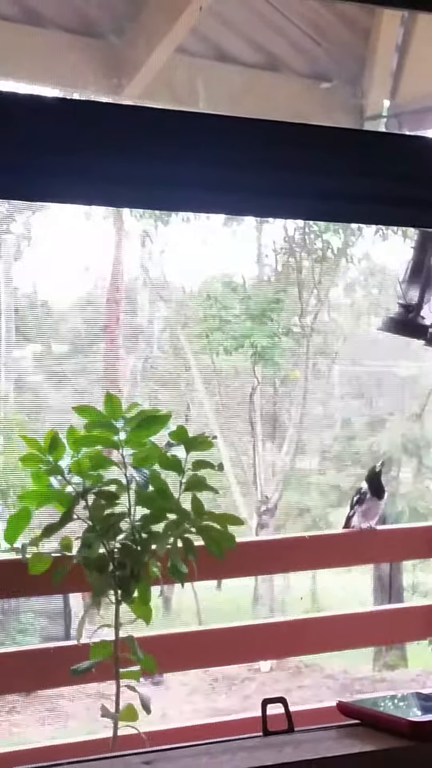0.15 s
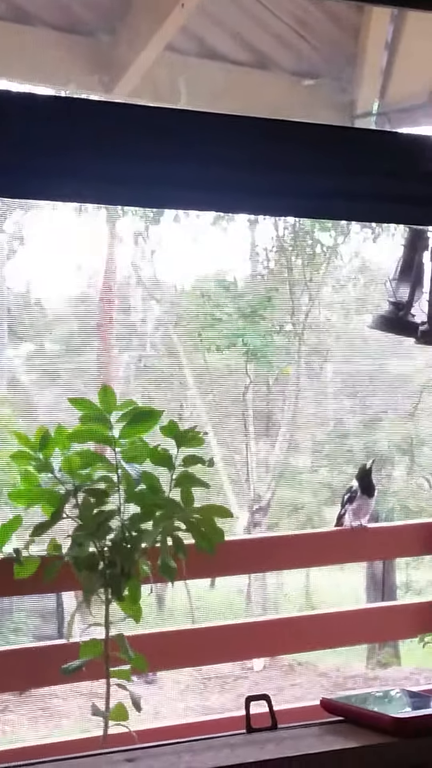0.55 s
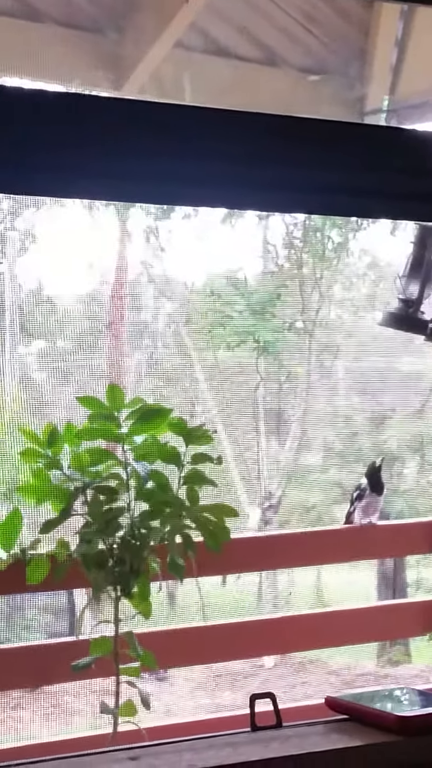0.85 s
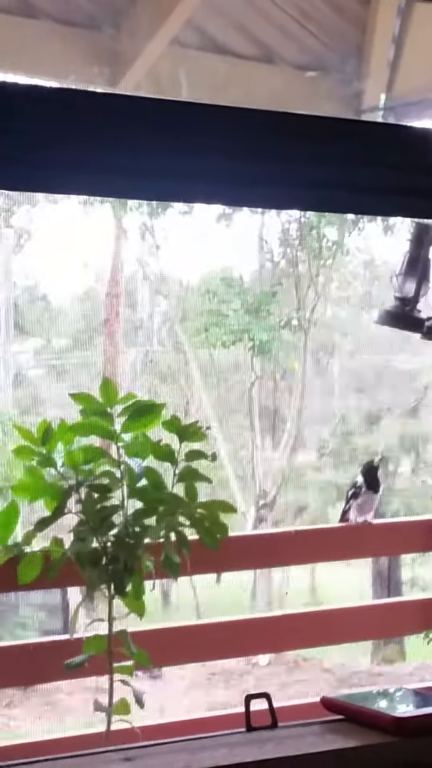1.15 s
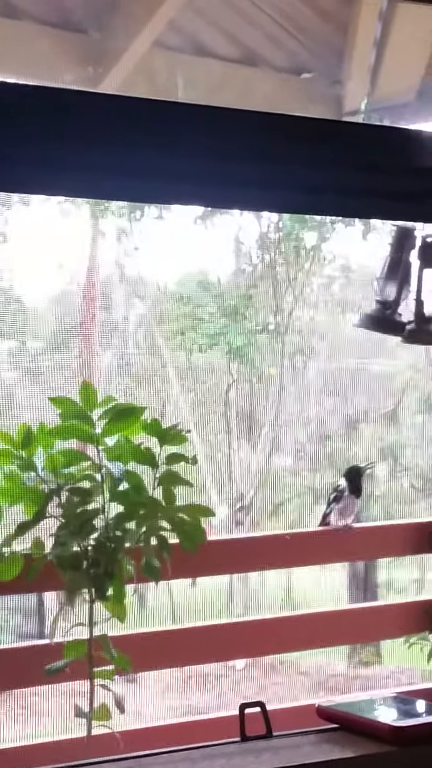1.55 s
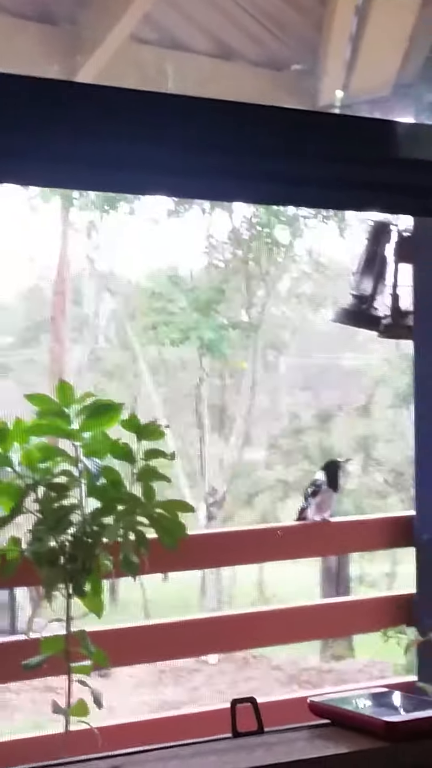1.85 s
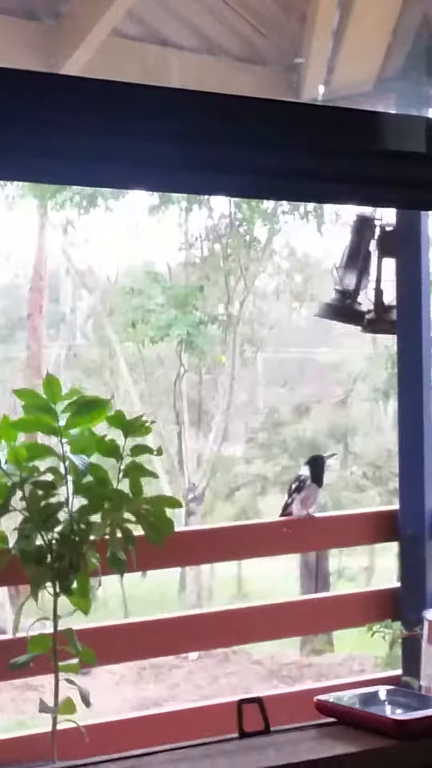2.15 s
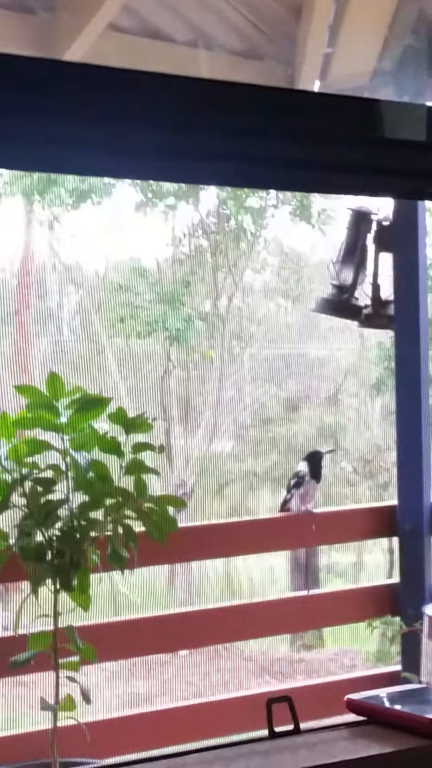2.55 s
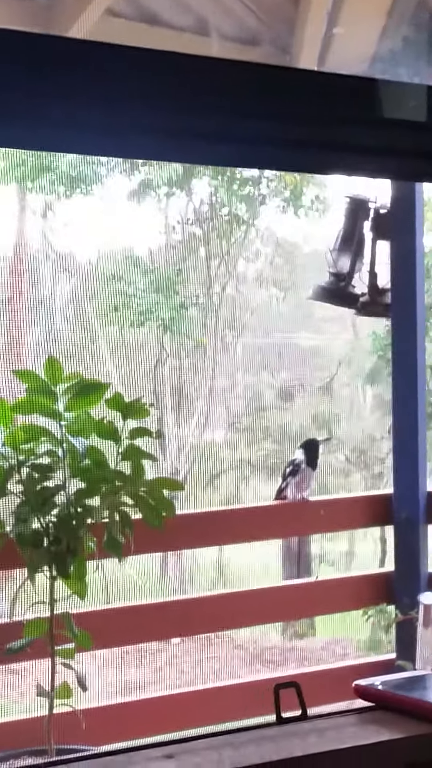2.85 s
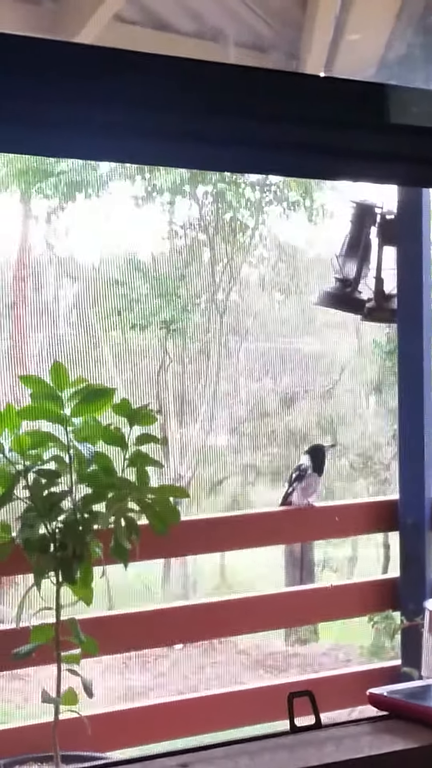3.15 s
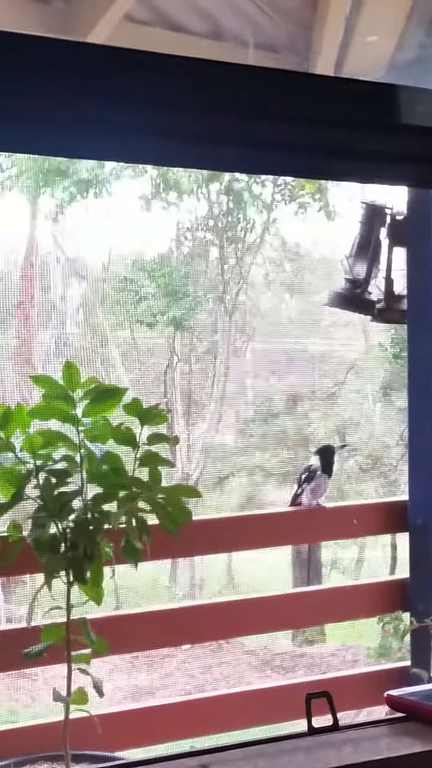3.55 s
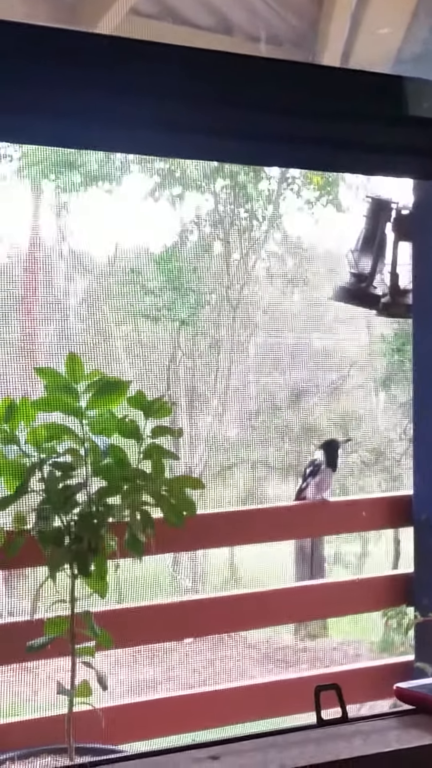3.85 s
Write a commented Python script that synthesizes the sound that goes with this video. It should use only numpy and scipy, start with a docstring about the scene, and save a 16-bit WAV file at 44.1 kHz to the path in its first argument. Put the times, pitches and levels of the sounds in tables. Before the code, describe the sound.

A butcherbird gives a strong, nearly steady high whistle from 0 to 0.4 s, then after a gap a tiny reedy catch and three quick whistles at 1.0-1.85 s, the later ones gliding down. Soft, low, flutelike hoots follow around 2.2-2.6 and 2.9-3.4 s. Short diffuse echoes trail the song. Fine rain hisses throughout; low wind thumps buffet the phone microphones until about 1.8 s.

```python
"""On a veranda, a butcherbird on the rail whistles four high fluted notes, then soft low ones, as gliding sines.
The microphones of a phone are a few metres off; roof and trees echo the song as dense, dying noise tails.
Fine rain hisses all round, shaped from noise, and eddies of wind thump on each port in about one cycle."""
import sys
import numpy as np
from scipy import signal
from scipy.fft import rfft, irfft
from scipy.io import wavfile
from scipy.ndimage import uniform_filter1d

SR = 44100
rng = np.random.default_rng(int(sys.argv[2]) if len(sys.argv) > 2 else 0)


def pcm_store(signal):
    """Save signal as 16-bit PCM."""
    levels = np.round(np.clip(np.atleast_2d(signal), -1, 1) * 32767)
    wavfile.write(sys.argv[1], SR, levels.astype(np.int16).T)


def volts_from_db(level):
    """Convert decibel levels to linear amplitude ratios."""
    exponent = np.asarray(level, float) / 20
    return 10 ** exponent


N = 176400
TIME = np.arange(N) / SR
FREQ = np.maximum(np.fft.rfftfreq(N, 1 / SR), 1)


def across(table):
    """Reads a table of (frequency [Hz], value) at every frequency, straight in log frequency."""
    hz, value = np.array(table, float).T
    return np.interp(np.log(FREQ), np.log(hz), value)


def walk(rate):
    """Random levels held for 1 / rate seconds and smoothed twice; spread near 1."""
    hold = int(SR / rate)
    steps = np.repeat(rng.standard_normal(N // hold + 1), hold)
    smooth = uniform_filter1d(uniform_filter1d(steps, hold), hold)
    return 1.67 * smooth[:N]


def swell(start, length, attack, release):
    """Rises from start, holds, and falls from start + length; each edge is half a cosine."""
    rise = (TIME - start) / attack
    fall = (start + length + release - TIME) / release
    edge = np.clip(np.minimum(rise, fall), 0, 1)
    return np.sin(np.pi / 2 * edge) ** 2


def late(x, lag_s):
    """The sound reaches the right port a little after the left, as a phase slope."""
    right = irfft(rfft(x) * np.exp(-2j * np.pi * FREQ * lag_s), N)
    return np.array([x, right])


# high whistles at the beak, one list a note:
# (time [s], pitch [Hz], fundamental rms level [dB], base level of the overtones [dB])
WHISTLES = [
    [(0, 2613, -31.5, -56), (.065, 2501, -20.5, -56), (.12, 2509, -18.5, -52), (.2, 2504, -18, -49),
     (.238, 2502, -16.5, -50.5), (.255, 2505, -32.5, -50), (.29, 2510, -32, -58), (.34, 2565, -35.5, -68),
     (.39, 2575, -46, -78), (.48, 2562, -58, -99.5)],
    [(1.03, 2830, -54, -62), (1.042, 2854, -42, -49), (1.056, 2720, -36, -50), (1.07, 2506, -27.5, -50.5),
     (1.088, 2507, -23, -53), (1.1, 2510, -41.5, -54), (1.13, 2505, -41, -61), (1.165, 2553, -39.5, -62),
     (1.21, 2580, -44, -64), (1.235, 2600, -53, -80)],
    [(1.236, 3300, -59, -83), (1.246, 3230, -45, -78), (1.258, 3090, -53, -75), (1.264, 2768, -38.5, -70),
     (1.284, 2675, -24, -52), (1.305, 2612, -33, -46.5), (1.35, 2622, -33.5, -50.5), (1.38, 2620, -39, -66),
     (1.43, 2600, -45, -80)],
    [(1.388, 3420, -54, -78), (1.397, 3260, -42, -78), (1.408, 3070, -45, -76), (1.42, 2967, -39, -74),
     (1.445, 2796, -32.5, -68), (1.49, 2745, -28.5, -45.5), (1.55, 2686, -22.5, -53),
     (1.59, 2604, -33, -48), (1.66, 2561, -30.5, -41), (1.74, 2544, -32.5, -47.5), (1.81, 2554, -42.5, -58),
     (1.822, 2562, -50, -57), (1.88, 2573, -62, -68)],
]
# second, third and fourth partial over that base: (level [dB] of each)
OVERTONES_DB = (-2, 3.5, -12.5)
# extra fullness of the second partial, one value a note: (level [dB] of each)
SECOND_PARTIAL_DB = (3.5, 1.5, -2, -0.5)
WAVER_HZ, WAVER_DB = 4.5, -1  # spread of the random pitch and level waver


def whistles():
    """Near sines that glide, with weak overtones and a slight waver in pitch and level."""
    out = 0
    drift = WAVER_HZ * walk(61.15)
    shake = WAVER_DB * walk(40.7)
    for note, second_db in zip(WHISTLES, SECOND_PARTIAL_DB):
        s, hz, db, over_db = np.array(note, float).T
        phase = 2 * np.pi * np.cumsum(np.interp(TIME, s, hz) + drift) / SR
        tone = volts_from_db(np.interp(TIME, s, db)) * np.sin(phase)
        overtones = 0
        for partial, partial_db in enumerate(OVERTONES_DB, 2):
            extra_db = second_db if partial == 2 else 0
            overtones = overtones + volts_from_db(partial_db + extra_db) * np.sin(partial * phase)
        overtones = volts_from_db(np.interp(TIME, s, over_db)) * overtones
        gate = swell(s[0] - .004, s[-1] - s[0], .004, .004)
        out = out + gate * volts_from_db(shake) * (tone + overtones)
    return np.sqrt(2) * out  # peak from rms


# low notes at the beak: (start [s], time to the release [s], starting pitch [Hz], starting rms level [dB])
HOOTS = [(2.21, 0.012, 1110, -39.5), (2.275, 0.044, 1112, -51.5), (2.435, 0.023, 888, -48.5),
         (2.48, 0.052, 820, -52.5), (2.54, 0.072, 855, -45.5), (2.87, 0.012, 898, -44.5),
         (2.96, 0.05, 832, -47.5), (3.01, 0.046, 832, -42), (3.08, 0.34, 797, -51.5),
         (3.144, 0.16, 814, -35.5), (3.3, 0.072, 804, -43)]
HOOT_ATTACK_S, HOOT_RELEASE_S = .025, .025
HOOT_SAG_HZ_PER_S, HOOT_FADE_DB_PER_S = 40, 85
HOOT_THIRD_DB = -22  # third partial over the fundamental


def hoots():
    """Soft low flute notes whose pitch sags and level fades, with a weak third partial."""
    out = 0
    for start, length, hz, db in HOOTS:
        since = TIME - start
        phase = 2 * np.pi * (hz - HOOT_SAG_HZ_PER_S * since / 2) * since
        level = volts_from_db(db - HOOT_FADE_DB_PER_S * np.clip(since, 0, 1))
        tone = np.sin(phase) + volts_from_db(HOOT_THIRD_DB) * np.sin(3 * phase)
        out = out + level * swell(start, length, HOOT_ATTACK_S, HOOT_RELEASE_S) * tone
    return np.sqrt(2) * out  # peak from rms


CATCH_S, CATCH_LENGTH_S, CATCH_HZ = 1.007, .022, 1260
CATCH_DB = (-51, -55, -55)  # partials 3 to 5, before the roughness


def throat_catch():
    """A reedy catch in the throat before the second whistle: three steady partials, roughened in level."""
    tone = 0
    for partial, db in enumerate(CATCH_DB, 3):
        tone = tone + volts_from_db(db) * np.sin(2 * np.pi * partial * CATCH_HZ * TIME)
    rough = volts_from_db(5 * walk(400))
    return np.sqrt(2) * tone * rough * swell(CATCH_S, CATCH_LENGTH_S, .008, .006)


# colour of the reflections off roof and trees: (frequency [Hz], level [dB])
REFLECTION_COLOUR = [(1500, 0), (2500, -4.5), (2660, 2), (2950, 5), (3250, -3), (8000, -4)]
ECHO_T60_S, ECHO_BUILD_S = .42, .03  # time to die by 60 dB, time constant of the build-up
ECHO_DB, ECHO_ALIKE = -7, .5  # mean level, power share common to both ports
LEAF_FLUTTER_DB, LEAF_FLUTTER_PER_S = 2.5, 90


def echoes(song):
    """Dense, coloured, dying reflections, partly the same at both ports; moving leaves make them flutter."""
    t = TIME[:SR]
    coloured = irfft(rfft(song) * volts_from_db(across(REFLECTION_COLOUR)), N)
    raw = rng.standard_normal((3, SR))
    tail = np.sqrt(ECHO_ALIKE) * raw[0] + np.sqrt(1 - ECHO_ALIKE) * raw[1:]
    decay = np.exp(-np.log(1000) * t / ECHO_T60_S)
    build = 1 - np.exp(-t / ECHO_BUILD_S)
    tail = tail * decay * build
    tail = tail / np.sqrt((tail ** 2).sum(axis=1, keepdims=True))  # unit energy
    flutter_db = LEAF_FLUTTER_DB * walk(LEAF_FLUTTER_PER_S)
    reflected = signal.fftconvolve(coloured[None], tail, axes=1)[:, :N]
    return volts_from_db(ECHO_DB + flutter_db) * reflected


# wind eddies on the ports: (time [s], level of the thump's envelope [dB], pitch [Hz], port [0 left, 1 right])
WIND_EDDIES = [(0.15, -22.5, 92, 0), (0.229, -28, 67.6, 0), (0.319, -40.5, 74.6, 0), (0.721, -39, 174, 0),
               (0.888, -35.5, 59, 0), (0.969, -31, 72, 0), (1.116, -28.5, 79.5, 0), (1.157, -23.5, 73, 0),
               (1.196, -33.5, 81, 0), (1.236, -30, 63, 0), (1.304, -28, 67, 0), (1.778, -39, 83, 0),
               (0.001, -34.5, 99, 1), (0.056, -31, 67, 1), (0.105, -20, 125, 1), (0.129, -31, 69, 1),
               (0.287, -34, 64, 1), (0.351, -28.5, 75, 1), (0.427, -31.5, 66, 1), (0.474, -33.5, 116.3, 1),
               (0.566, -26.5, 61, 1), (0.609, -21.5, 60.7, 1), (0.645, -30, 70, 1), (0.692, -27, 67, 1),
               (0.723, -27, 118, 1), (0.759, -33, 79, 1), (0.786, -35.5, 70, 1), (0.812, -37.5, 78, 1),
               (1.248, -31, 64, 1), (1.322, -32, 72, 1), (1.408, -34, 73, 1), (1.433, -28.5, 81, 1),
               (1.46, -25.5, 84, 1), (1.529, -33.5, 52.6, 1), (1.579, -36.5, 69.6, 1)]
EDDY_TURNS, RUMBLE_S = 0.44, 0.032  # half-widths at 1/e: thump in cycles, rumble in seconds
EDDY_EDGE_DB, RUMBLE_DB = -37, -16  # rms over the thump's envelope


def noise_band(corner_hz, kind, db):
    """Filtered noise for both ports, set to an rms level."""
    sos = signal.butter(2, corner_hz, kind, fs=SR, output="sos")
    noise = signal.sosfilt(sos, rng.standard_normal((2, N)))
    return volts_from_db(db) * noise / noise.std()


def wind():
    """Each eddy is a thump of about one cycle on one port, with a rough edge, in a longer rumble."""
    out = np.zeros((2, N))
    turns = rng.random(len(WIND_EDDIES))  # random starting phase
    edge = noise_band(350, "low", EDDY_EDGE_DB)
    rumble = noise_band((30, 110), "band", RUMBLE_DB)
    for (start, db, hz, port), turn in zip(WIND_EDDIES, turns):
        since = TIME - start
        cycles = since * hz
        thump = np.cos(2 * np.pi * (cycles + turn)) + edge[port]
        out[port] += volts_from_db(db) * np.exp(-(cycles / EDDY_TURNS) ** 2) * thump
        out[port] += volts_from_db(db) * np.exp(-(since / RUMBLE_S) ** 2) * rumble[port]
    return out


# rain on leaves and roof over a low murmur, before it swells: (frequency [Hz], density [dB per Hz])
RAIN_SPECTRUM = [(20, -79.5), (60, -73.5), (130, -79.5), (260, -85.5), (500, -84.5), (800, -81.5),
                 (2000, -87.5), (16000, -96)]
# swelling and easing of the hiss: (time [s], level [dB])
RAIN_SWELL = [(0, 2.5), (.7, 2.5), (.9, 1.5), (1.7, 2), (1.9, 2), (2, -0.5), (2.9, -0.5), (3.1, 1),
              (3.4, 2), (4, -1)]
# power of the rain common to both ports: (frequency [Hz], share [0-1])
RAIN_ALIKE = [(40, 0.62), (400, 0.66), (900, 0.55), (2000, 0.02), (5000, 0)]
RAIN_LATE_S = .00014  # lag of the common part at the right port


def rain():
    """Smooth hiss of fine drops all round: shaped noise, partly common to the ports, that swells and eases."""
    raw = rng.standard_normal((3, N))
    share = np.clip(across(RAIN_ALIKE), 0, 1)
    common = np.sqrt(share) * rfft(late(raw[0], RAIN_LATE_S))
    apart = np.sqrt(1 - share) * rfft(raw[1:])
    octave = np.log2(FREQ)
    ends = np.clip(np.minimum(octave - 3, 15 - octave), 0, 1)  # tapers below 16 Hz and above 16.4 kHz
    hiss = (common + apart) * volts_from_db(across(RAIN_SPECTRUM)) * np.sqrt(SR / 2) * ends
    return irfft(hiss, N) * volts_from_db(np.interp(TIME, *np.array(RAIN_SWELL).T))


DIRECT_DB, BIRD_LATE_S = -1.5, .00009  # direct path: gain, lag at the right port
LOW_ECHO_SHARE = .7  # amplitude of the low notes and the catch sent to the echoes


def scene():
    """Bird, echoes, wind and rain add up as sound pressure at the two ports."""
    high = whistles()
    low = hoots() + throat_catch()
    direct = volts_from_db(DIRECT_DB) * late(high + low, BIRD_LATE_S)
    return direct + echoes(high + LOW_ECHO_SHARE * low) + wind() + rain()


# response of the microphone ports, left then right: (frequency [Hz], level [dB])
PORT_RESPONSE = [
    [(1200, 0.4), (2100, 1.1), (2450, -1), (2800, -1), (5200, -2.5), (7400, 0.5), (7900, -4), (8400, -17.5),
     (9400, -19), (15400, -15.5)],
    [(300, -1), (600, -1), (1200, -1.5), (2100, 3.5), (2400, -6), (2800, -9.5), (4200, -11), (5200, -19.5),
     (7500, -17.5), (8300, -17), (8800, -18.5), (9400, -9), (10300, -5.5), (11500, -9), (12500, -12.5),
     (14000, -17), (15400, -13)],
]


def microphone_ports(dry):
    """Each port colours the sound with its own frequency response."""
    response = volts_from_db(np.array([across(port) for port in PORT_RESPONSE]))
    return irfft(rfft(dry) * response, N)


def roll_off(x):
    """The treble ends steeply here."""
    return signal.sosfilt(signal.butter(12, 15630, fs=SR, output="sos"), x)


def record(dry):
    """The two ports pick up the veranda and the finished mix is stored."""
    mix = microphone_ports(dry)
    return roll_off(mix)


dry = scene()
out = record(dry)
pcm_store(out)
```